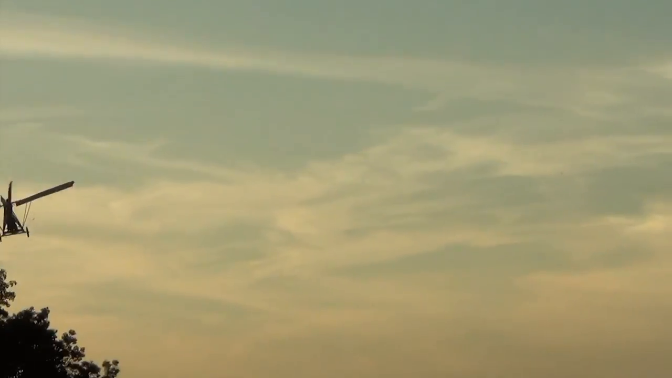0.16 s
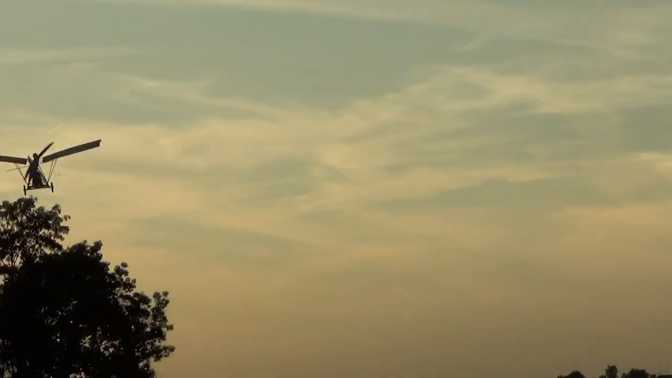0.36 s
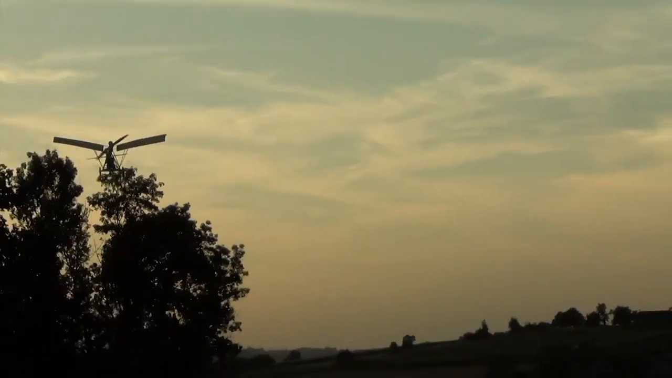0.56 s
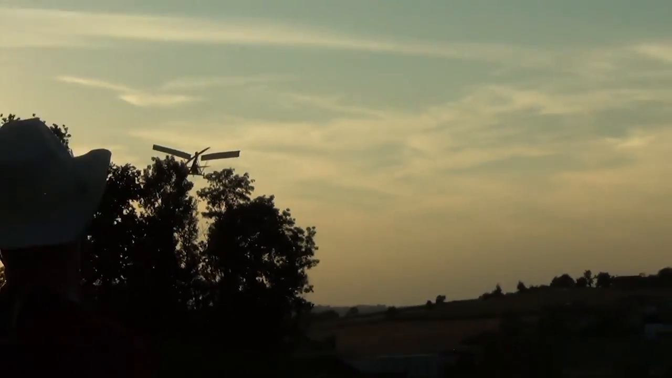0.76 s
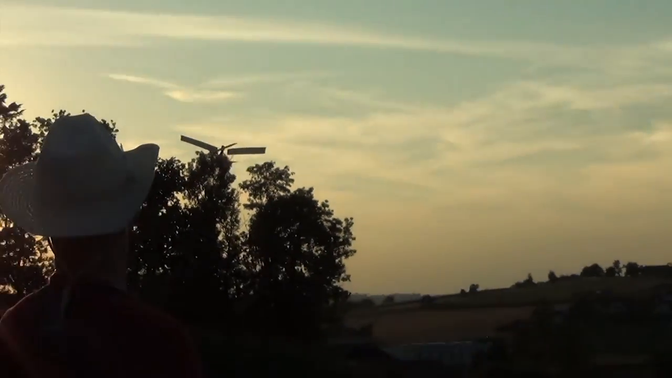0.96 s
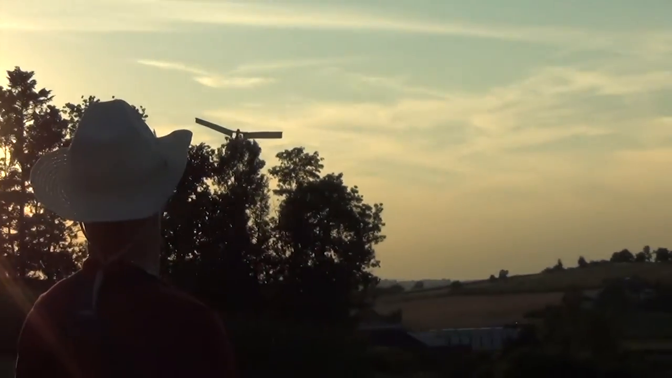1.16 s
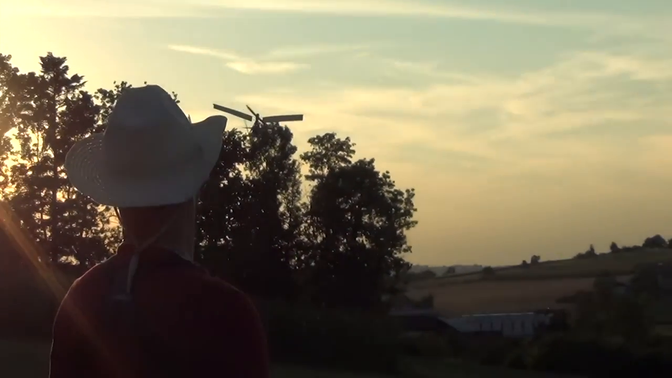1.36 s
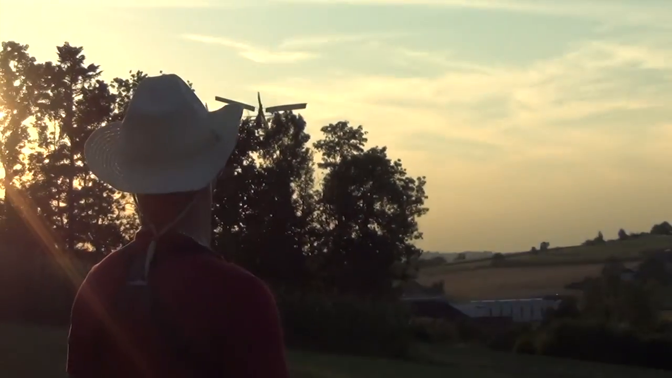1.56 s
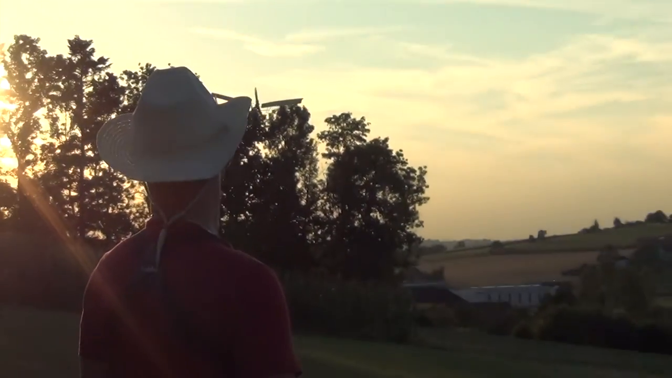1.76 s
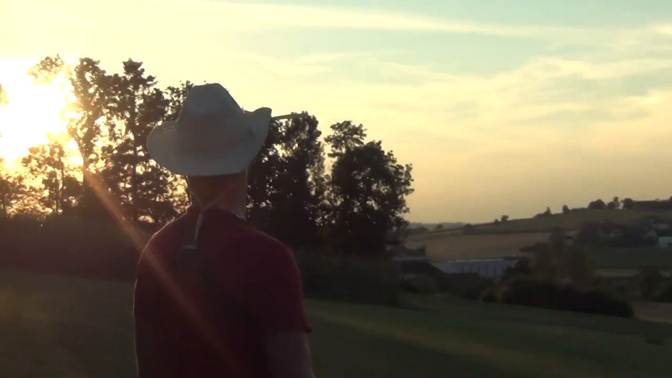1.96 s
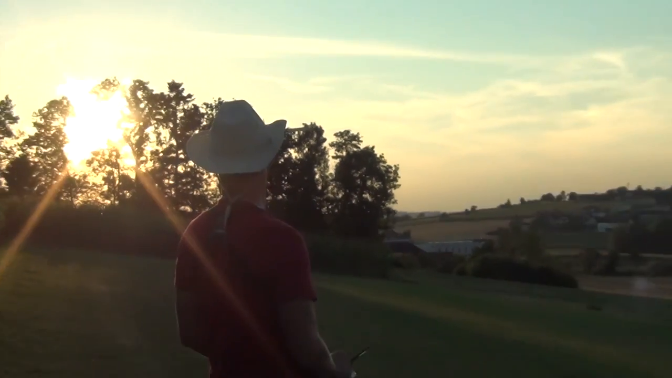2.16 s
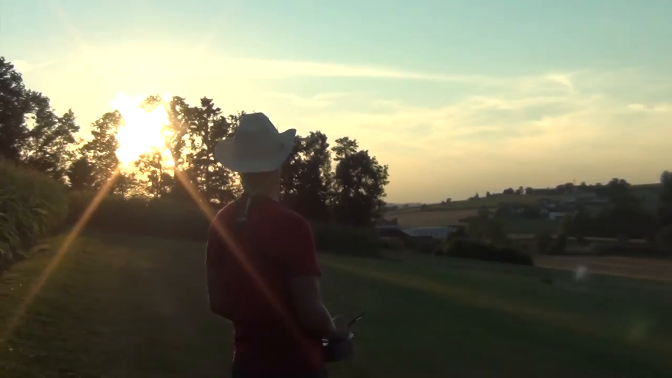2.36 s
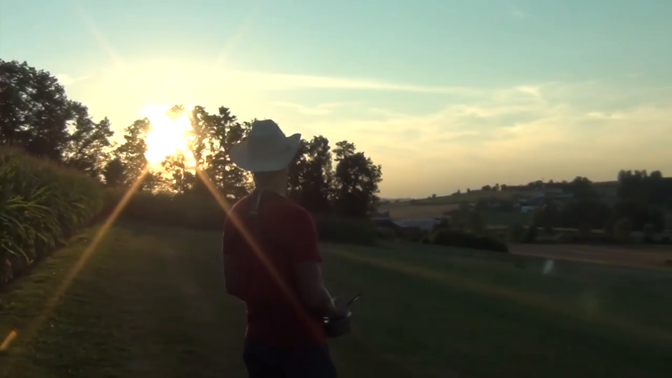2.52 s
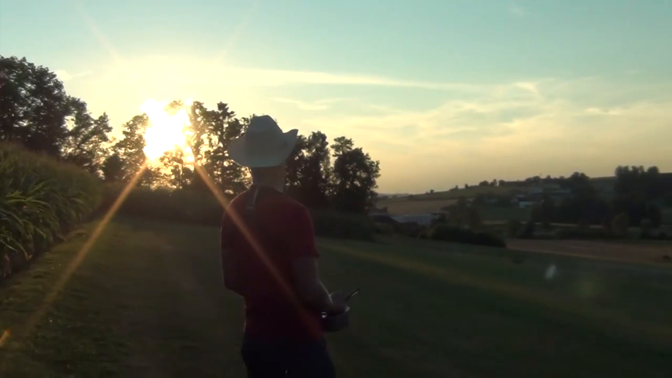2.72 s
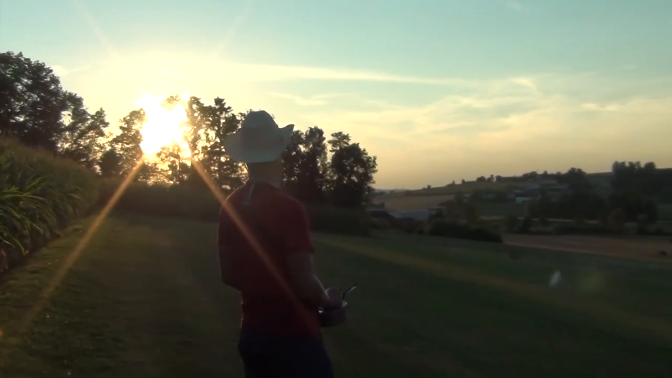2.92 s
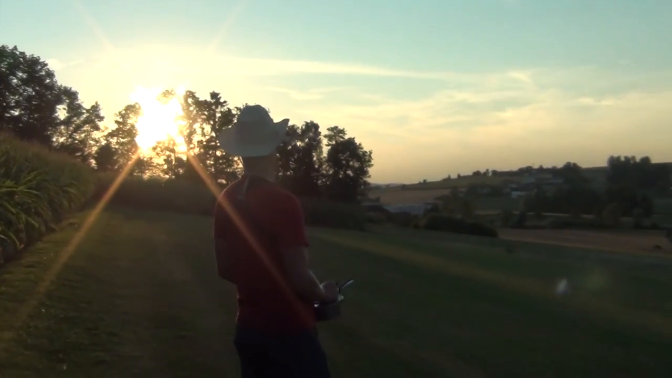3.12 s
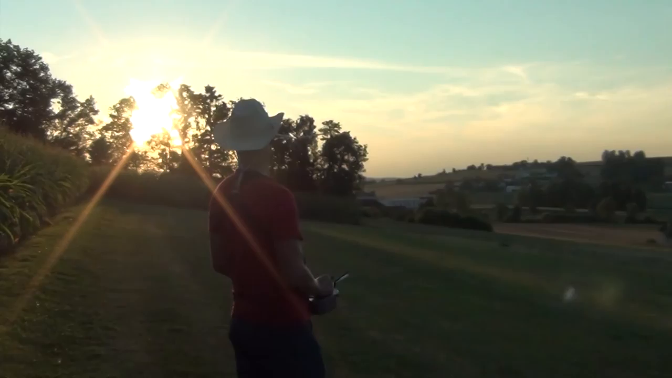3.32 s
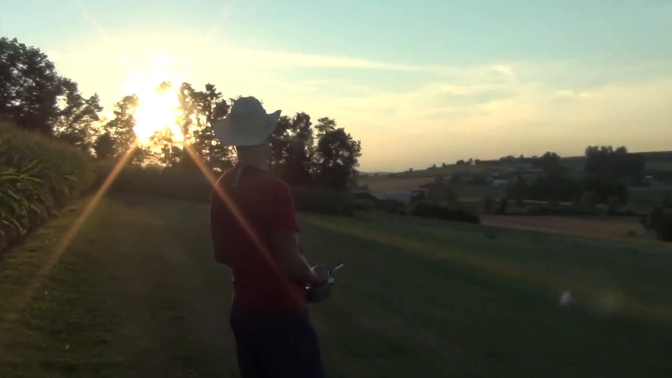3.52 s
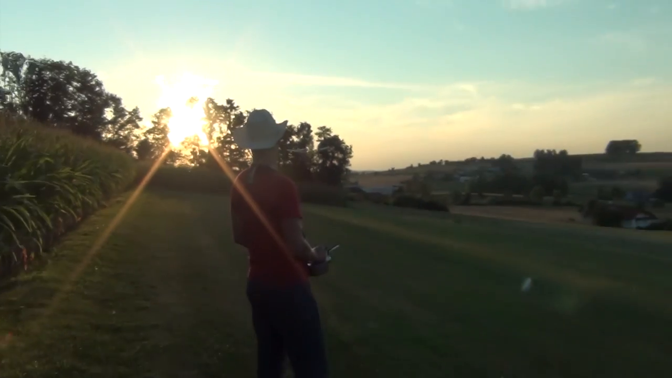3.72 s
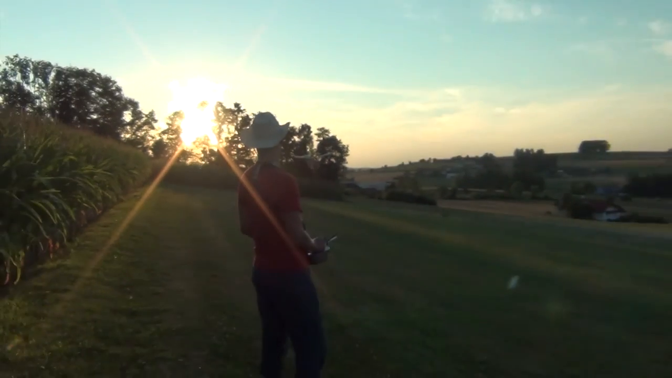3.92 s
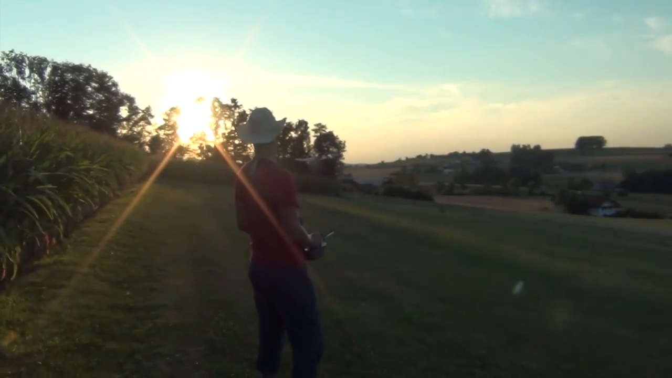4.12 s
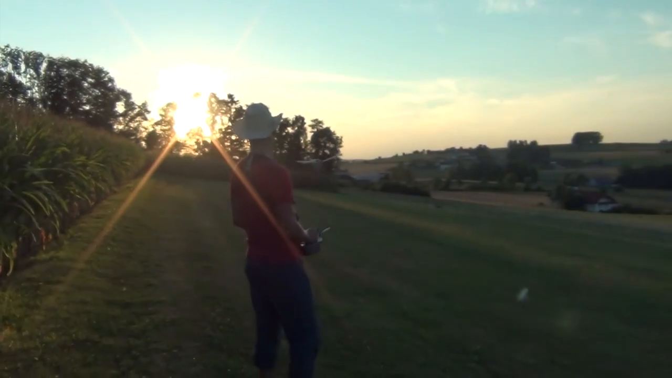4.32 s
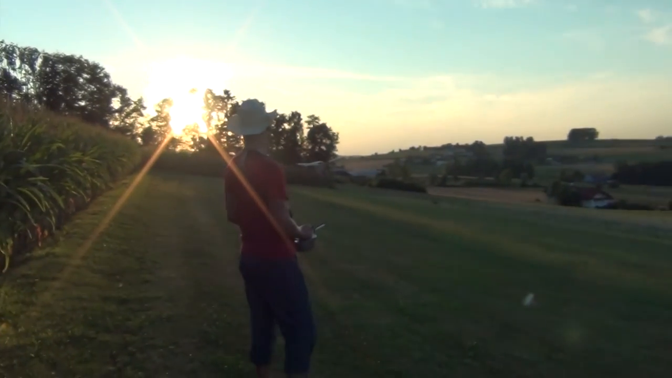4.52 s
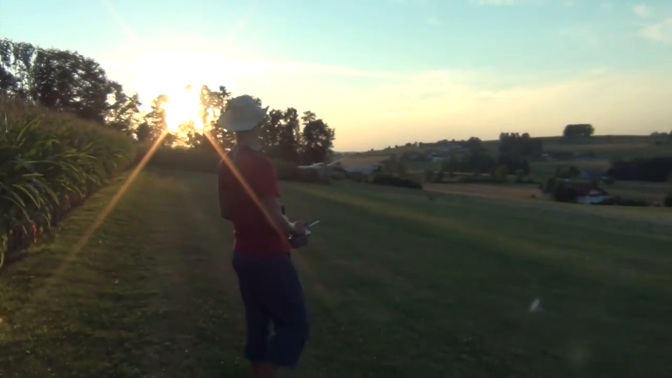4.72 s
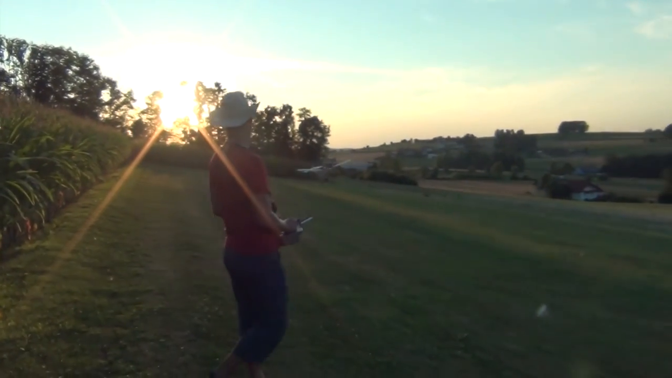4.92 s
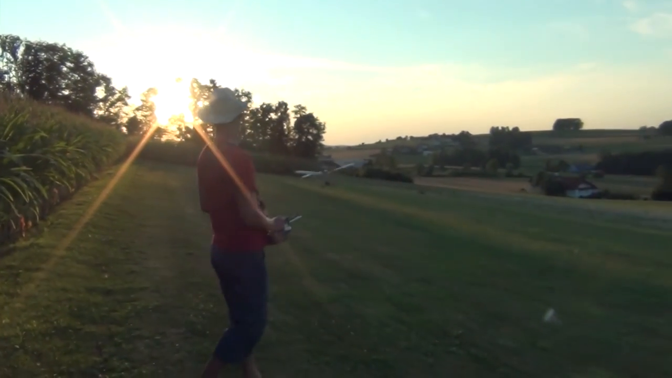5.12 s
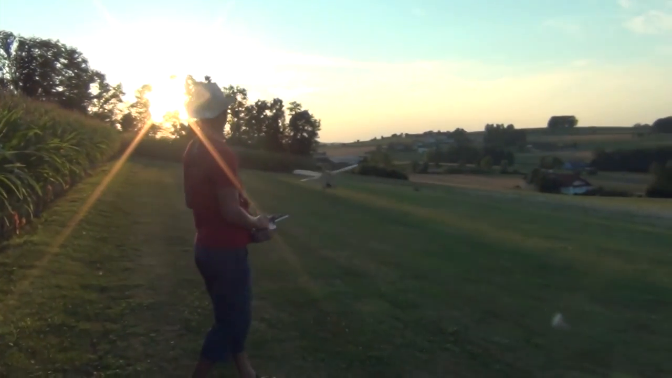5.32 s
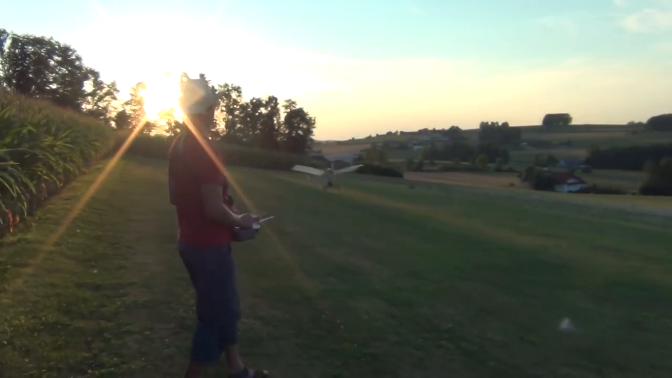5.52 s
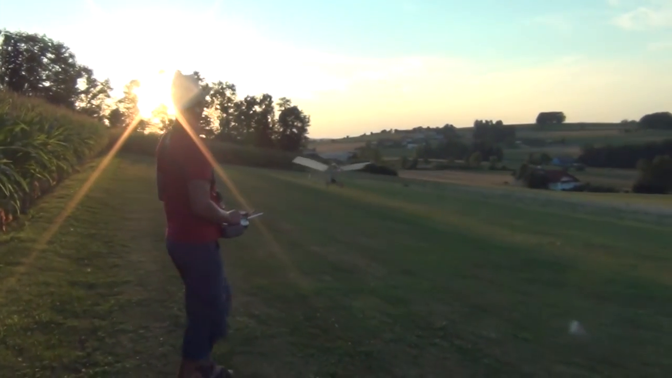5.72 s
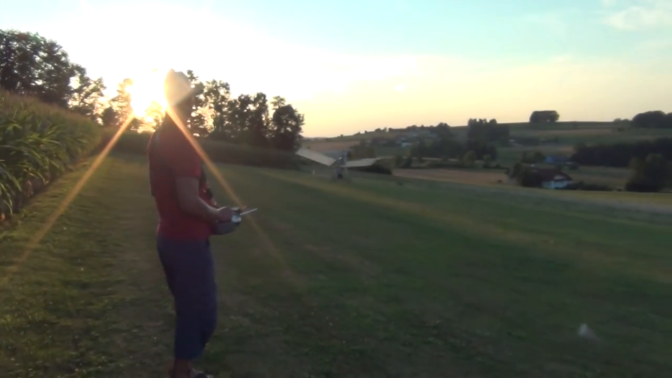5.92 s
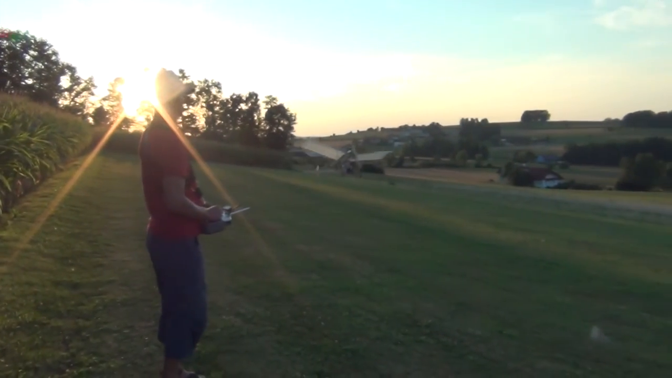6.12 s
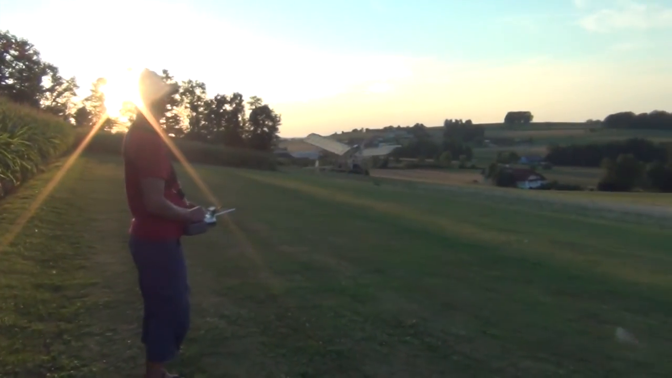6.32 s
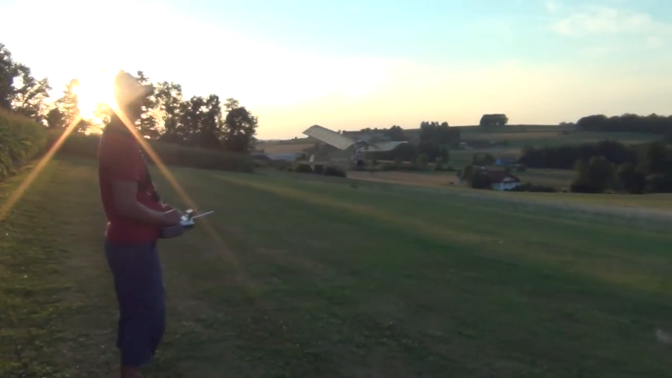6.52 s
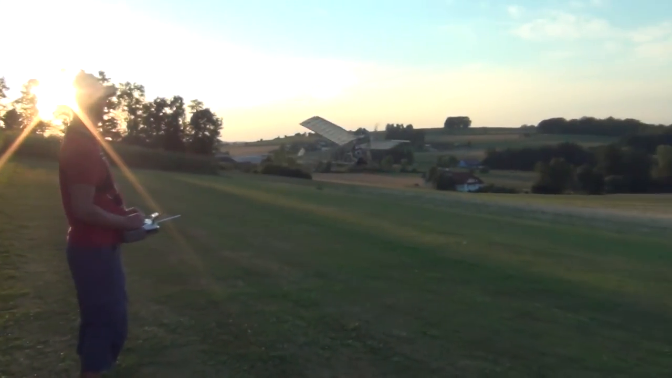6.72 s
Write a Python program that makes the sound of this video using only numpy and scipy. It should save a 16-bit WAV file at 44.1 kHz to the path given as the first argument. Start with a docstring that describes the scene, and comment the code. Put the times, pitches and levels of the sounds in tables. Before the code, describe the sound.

In an open field, a small electric model aircraft whirs faintly while a distant engine drones and slowly speeds up. A few dull knocks sound near the microphone. Past four seconds the geared whine climbs and grows much louder and brighter, peaks just after five seconds, then sinks in pitch into a harsh, rattling flutter close by.

```python
"""An open field, where a geared electric model aircraft circles and flies in close. Its motor pinion drives a
two-blade propeller: the gear whine wobbles once a turn, the blades chirp, and the teeth rattle in the light
airframe, slapping once a blade when the throttle drops. An engine drones far away, slowly gaining speed; a few
soft knocks sound near the microphone, and the motor mount pings once. Whines are phase-modulated sines that
follow the shaft speeds; rattle and scraping are pulsed, filtered noise."""
import sys
import numpy as np
from scipy import signal
from scipy.fft import rfft, irfft
from scipy.io import wavfile
from scipy.ndimage import uniform_filter1d

SR = 44100
rng = np.random.default_rng(int(sys.argv[2]) if len(sys.argv) > 2 else 0)


def generate_wav(sig):
    """Save sig (samples, or channels by samples) to the path in sys.argv[1] as 16-bit PCM at SR."""
    pcm = np.round(np.clip(np.atleast_2d(sig).T, -1, 1) * 32767).astype(np.int16)
    wavfile.write(sys.argv[1], SR, pcm)


N = 302905
TIME = np.arange(N) / SR
GEAR_RATIO, PINION_TEETH = 4.5, 10  # motor turns per propeller turn; teeth on the motor pinion


def undb(db):
    """Decibels to gain."""
    return 10 ** (np.asarray(db) / 20)


def unit(x):
    """Scale to rms 1."""
    return x / np.sqrt(np.mean(x ** 2))


def curves(table):
    """The columns after the time column, drawn as straight lines through every sample."""
    seconds, *columns = np.transpose(table)
    return [np.interp(TIME, seconds, column) for column in columns]


def level(table):
    """The gain that follows a table of time and level."""
    return undb(curves(table)[0])


def walk(rate):
    """Smooth chance that changes about rate times a second; spread near 1."""
    hold = max(2, int(SR / rate))
    steps = np.repeat(rng.standard_normal(N // hold + 1), hold)
    smooth = uniform_filter1d(uniform_filter1d(steps, hold), hold)
    return unit(smooth[:N])


def colour(x, points, bumps=()):
    """Filter by (Hz, dB) points and by resonant (Hz, width Hz, dB) bumps."""
    f = np.arange(N // 2 + 1) * SR / N
    hz, db = np.transpose(points)
    shape = np.interp(np.log(f + 1), np.log(hz), db)
    for centre, width, height in bumps:
        shape = shape + height * np.exp(-2 * ((f - centre) / width) ** 2)
    return irfft(rfft(x) * undb(shape), N)


def blend(tone, noise, share):
    """Tone and noise at constant power; share is the tone's part."""
    share = np.clip(share, 0, 1)
    return np.sqrt(share) * tone + np.sqrt(1 - share) * noise


def throb(turns, depth_db):
    """A swell once a cycle, rms 1."""
    return unit(undb(depth_db * np.cos(2 * np.pi * turns)))


# Spectrum of the open-field background, relative
# Columns: pitch_hz, density_db_per_hz
FIELD_COLOUR = [(15, -60), (25, -27.5), (97, -13), (145, -5.5), (168, -6), (195, -6), (247, -10.5),
                (303, -8), (461, -10.5), (619, -1), (814, -1.5), (1070, -4.5), (1200, -10), (2000, -12),
                (2600, -45), (4400, -120)]
# Level of the background
# Columns: time_s, level_db
FIELD_LEVEL = [(0, -52.5), (.24, -51.5), (.3, -49.5), (.75, -48), (1.15, -51.5), (1.9, -49), (2.9, -46.5),
               (3.5, -47.5), (6.87, -44)]


def field():
    """Distant country noise, random noise in a fixed colour, that swells gently."""
    air = unit(colour(rng.standard_normal(N), FIELD_COLOUR))
    return air * undb(curves(FIELD_LEVEL)[0] + 0.22 * walk(5.7))


# Speed of the distant engine
# Columns: time_s, rate_firings_per_s
ENGINE_SPEED = [(0, 72), (1, 73.8), (1.5, 75.6), (3.5, 80.8), (4, 81.8), (4.6, 82.5), (6.87, 82.7)]
# Level of the fifth partial, which moves on its own
# Columns: time_s, level_db
FIFTH_LEVEL = [(0, -61), (.2, -61), (.5, -69.5), (6.87, -69)]
# Level of the drone
# Columns: time_s, level_db
DRONE_LEVEL = [(0, -71.5), (2.1, -62.5), (2.9, -51), (3.5, -52.5), (3.85, -69.5), (4.25, -52.5), (5.4, -51),
               (6.87, -71.5)]
# Partials of the drone, relative to its level
# Columns: multiple_of_firing_rate, strength_db
DRONE_PARTIALS = [(3, -12), (4, 1.5)]
# Level of the exhaust pipe tone
# Columns: time_s, level_db
PIPE_LEVEL = [(0, -64), (.45, -57), (1.2, -66), (1.95, -62), (2.25, -60.5), (2.92, -48), (3.15, -50),
              (3.4, -59), (4.2, -57.5), (4.35, -47.5), (4.5, -55), (5.2, -51), (5.45, -57), (5.8, -41.5),
              (6.05, -41.5), (6.3, -60.5), (6.7, -45), (6.87, -50)]
# Partials of the pipe tone, relative to its level
# Columns: multiple_of_firing_rate, strength_db
PIPE_PARTIALS = [(7, -1.5), (8, -10.5)]
# Level of the engine's bark
# Columns: time_s, level_db
BARK_LEVEL = [(0, -77), (.75, -57), (1.2, -70), (1.4, -58.5), (1.8, -63), (2, -60), (2.2, -54.5),
              (2.42, -44.5), (2.65, -57), (2.92, -48.5), (3.25, -52.5), (3.6, -60.5), (6.87, -55.5)]
# Partials of the bark, relative to its level
# Columns: multiple_of_firing_rate, strength_db
BARK_PARTIALS = [(8, -8), (9, 1), (10, -3.5), (12, -13), (13, -11.5)]
# Level of an extra eighth partial, which swells on its own
# Columns: time_s, level_db
EIGHTH_LEVEL = [(0, -77), (.22, -67), (.3, -51), (.55, -61.5), (1.2, -72)]
# Level of the eleventh partial, which swells on its own
# Columns: time_s, level_db
ELEVENTH_LEVEL = [(0, -70), (.55, -63), (.75, -54.5), (1.2, -59.5), (1.4, -52.5), (1.75, -60),
                  (1.98, -50.5), (2.45, -53), (2.63, -74), (2.85, -51), (3.5, -64)]
ENGINE_HUM_DB = -55.5  # steady hum at twice the firing rate


def far_engine(waver_db=1.9, smear=0.22, scramble=0.71):
    """Exhaust partials that waver in the moving air: the low hum, and the bark above it."""
    firing = 2 * np.pi * np.cumsum(curves(ENGINE_SPEED)[0]) / SR

    def partial(order, db):
        """Echoes on the long way shift its phase, which softens the pulses into a drone."""
        phase = scramble * rng.standard_normal() + smear * walk(25)
        return np.sqrt(2) * undb(db + waver_db * walk(9)) * np.cos(round(order) * firing + phase)

    def chord(partials, level_table):
        """Several partials that share one level curve."""
        level_db, = curves(level_table)
        return sum(partial(order, db + level_db) for order, db in partials)

    hum = partial(order=2, db=ENGINE_HUM_DB)
    hum = hum + partial(order=5, db=curves(FIFTH_LEVEL)[0])
    drone = chord(DRONE_PARTIALS, DRONE_LEVEL)
    pipe = chord(PIPE_PARTIALS, PIPE_LEVEL)
    bark = chord(BARK_PARTIALS, BARK_LEVEL)
    bark = bark + partial(order=8, db=curves(EIGHTH_LEVEL)[0])
    bark = bark + partial(order=11, db=curves(ELEVENTH_LEVEL)[0])
    return hum + drone, pipe + bark


# Knocks and ticks near the microphone, and one short ping of the aircraft's motor mount near 2.5 kHz; each
# falls 45 dB over its decay # Columns: start_s, level_db, pitch_hz, decay_s, grit_0_to_1
KNOCKS = [(0.63, -47, 850, .25, .95), (0.749, -42.5, 1150, .05, .9), (0.79, -42, 10000, .006, 1),
          (0.992, -41, 430, .06, .6), (2.4152, -25, 1300, .013, .45), (2.4183, -30, 1150, .012, .3),
          (2.4255, -27, 900, .018, .35), (2.4285, -29, 1500, .016, .45), (3.84, -52, 65, .22, .5),
          (3.984, -33.5, 2550, .022, .1), (4.235, -50, 70, .14, .5), (4.402, -35, 1700, .06, .95),
          (6.295, -41, 350, .05, .9)]


def knocks():
    """Dull, quickly damped knocks, part ring and part grit."""
    out = np.zeros(N)
    for start, db, hz, decay, grit in KNOCKS:
        sounding = (TIME > start) & (TIME < start + decay)
        t = TIME[sounding] - start
        band = signal.butter(3, [hz / 2, 2 * hz], "bandpass", fs=SR, output="sos")
        grain = unit(signal.sosfilt(band, rng.standard_normal(len(t))))
        attack = np.minimum(1, 2 * hz * t)  # half a cycle
        ring = -np.sqrt(2) * np.sin(2 * np.pi * hz * t) * attack
        out[sounding] += undb(db - 45 * t / decay) * blend(ring, grain, 1 - grit)
    return out


# Colour of the tooth rattle
# Columns: pitch_hz, gain_db
RATTLE_COLOUR = [(260, -64), (450, -14), (561, -8.5), (752, -9.5), (884, -47), (1200, 0), (1900, -7.5),
                 (2580, -3.5), (2820, -4), (3460, -6.5), (3830, -5), (6130, -3), (7310, -10), (10500, -13),
                 (15000, -41)]
# Airframe resonances and hollows
# Columns: centre_hz, width_hz, gain_db
AIRFRAME = [(2040, 190, -3), (2520, 830, 1), (3294, 325, 7), (3990, 280, -3.5), (6760, 290, 6),
            (7220, 680, -4.5)]


def tooth_clicks(teeth, scatter_db):
    """One click of chance size and sign each time a tooth engages."""
    at = np.flatnonzero(np.diff(np.floor(teeth)) > 0)
    chance = rng.standard_normal((len(at), 2))
    clicks = np.zeros(N)
    clicks[at] = undb(scatter_db * chance[:, 0]) * np.sign(chance[:, 1])
    return unit(clicks)


def tooth_rattle(motor, blades, slack, near, scrape_db=4):
    """Tooth clicks and scraping, pulsed by blades and motor turns, ring the light airframe."""
    contact = tooth_clicks(PINION_TEETH * motor, scatter_db=3.0)
    contact = contact + undb(scrape_db) * rng.standard_normal(N)
    # a slow, slack train chatters more deeply
    contact = contact * throb(blades, depth_db=near * (1.46 + 0.61 * slack))
    contact = contact * throb(motor, depth_db=near * (1.0 + 0.81 * slack))
    return unit(colour(contact, RATTLE_COLOUR, AIRFRAME))


def chatter(prop, blades, points, blade_db, motor_db):
    """Scraping that swells with each blade and each motor turn, heard through one resonance."""
    scrape = rng.standard_normal(N) * throb(blades, blade_db)
    scrape = scrape * throb(GEAR_RATIO * prop + rng.random(), motor_db)
    return unit(colour(scrape, points))


# Low tones of blades and motor, relative to each other
# Columns: multiple_of_propeller_speed, strength_db
HUM_ORDERS = [(2, -32), (3, -15), (4, -3), (4.5, 0), (6, -9), (8, -13)]


def low_hum(prop):
    """Low tones of blades and motor, locked to the propeller, each wavering in level."""
    return unit(sum(undb(db + 2.2 * walk(25)) * np.sin(2 * np.pi * k * prop) for k, db in HUM_ORDERS))


def runout(turns, count):
    """Tooth errors that come round again on every turn of the big gear; spread near 1."""
    phases = rng.uniform(0, 2 * np.pi, count)
    return unit(sum(np.sin(2 * np.pi * k * turns + p) / np.sqrt(k) for k, p in enumerate(phases, 2)))


# How far the mesh tone swings once a turn; the big gear wobbles while the throttle opens
# Columns: time_s, swing_radians
WOBBLE = [(0, .3), (3.85, .4), (4.15, 2), (4.5, 2.6), (4.95, 2.1), (5.12, .6), (6.87, .8)]
# Mesh overtones from the third up, relative to each other
# Column: strength_db
OVERTONE_DB = [-21, -7, -6, -3, -1, 0, -6, -10]
# Colour of the upper mesh overtones
# Columns: pitch_hz, gain_db
WHISTLE_COLOUR = [(3000, -28), (4200, -14), (6300, 0), (7500, -5), (8850, -7), (9500, -2), (10500, -6),
                  (11300, -9.5), (12300, -9), (15000, -18)]


def mesh_tones(speed, prop, blades, slack, near, uneven=0.018, flutter=.014):
    """The gear mesh tone, its octave and its high whistle, each near rms 1, at the rate the teeth meet."""
    motor = GEAR_RATIO * prop
    steady = 2 * np.pi * PINION_TEETH * motor
    # the big gear runs off centre and swings the tone once a turn
    wobble = curves(WOBBLE)[0] * (np.sin(2 * np.pi * prop) + .25 * runout(prop, count=4))
    # close by, each blade makes the tone surge: thin lines either side
    blade_swing = 1.25 * near * np.sin(2 * np.pi * (blades - .1))
    jitter = (.2 + .45 * near) * walk(250) + .35 * walk(30)
    mesh = np.sin(steady + wobble + blade_swing + jitter)
    mesh = mesh * throb(blades + .1, depth_db=6 * near ** 2)
    mesh = mesh * undb(.8 * runout(prop, count=8) + 1.8 * walk(180) + 1.2 * walk(30))
    # the wing radiates only this band
    mesh = colour(mesh, [(700, -25), (1000, 1), (1150, 0.5), (1520, -0.5), (1800, -6)])

    # the teeth bounce within their play, which roughens the overtones far more
    swing = .055 * np.sin(2 * np.pi * prop) + uneven * runout(prop, count=5) + flutter * walk(300)
    swing_speed = speed * (1 - .85 * slack) * swing
    lead = 2 * np.pi * PINION_TEETH * GEAR_RATIO * np.cumsum(swing_speed) / SR
    octave = np.sin(2 * steady + wobble + .5 * lead * near + .75 * walk(90))
    octave = octave * throb(motor, depth_db=4.5) * undb(2 * walk(200))
    overtones = sum(undb(db + 3.5 * walk(330)) * np.sin(k * (steady + lead) + 1.1 * walk(800))
                    for k, db in enumerate(OVERTONE_DB, 3))
    whistle = unit(colour(overtones, WHISTLE_COLOUR)) * throb(motor, depth_db=3.5)
    return unit(mesh), unit(octave), whistle


# Level of the slack teeth slapping, in bouts
# Columns: time_s, level_db
SLAP_LEVEL = [(0, -75), (5.4, -55), (5.9, -42), (6.36, -40.5), (6.385, -32), (6.44, -33), (6.48, -39),
              (6.51, -31), (6.58, -31), (6.605, -35), (6.66, -32.5), (6.7, -30), (6.87, -31.5)]
# Colour of a slap
# Columns: pitch_hz, gain_db
SLAP_COLOUR = [(300, -50), (2100, -22), (2600, -11), (3600, -7), (5200, -0.5), (6300, 5.5), (6850, 2),
               (7300, -7), (10800, -11), (12000, -11), (14000, -21)]
SLAP_ATTACK_S, SLAP_DECAY_S, RING_DECAY_S = 0.0014, 0.01, 0.0067
RING_HZ, RING_DB = 2577, -5  # the mount's ring, and its level beside the grit


def strikes(blades, speed, decay_s):
    """A quick rise and a fall once a blade, rms 1."""
    since_s = (blades % 1) / (2 * speed)
    rise = 1 - np.exp(-(since_s / SLAP_ATTACK_S) ** 2)
    return unit(rise * np.exp(-since_s / decay_s))


def slaps(blades, speed, scatter_db=2.0, ring_scatter_db=4):
    """Each blade throws the slack teeth across their play: a burst of grit, and the mount rings."""
    which = np.floor(blades - np.floor(blades.min())).astype(int)
    chance = rng.standard_normal((which.max() + 1, 2))[which]  # one draw for each blade
    grit = rng.standard_normal(N) * strikes(blades, speed, SLAP_DECAY_S)
    grit = unit(colour(grit, SLAP_COLOUR))
    ring = np.sin(2 * np.pi * RING_HZ * TIME + 1.1 * walk(150)) * strikes(blades, speed, RING_DECAY_S)
    ring = unit(ring * undb(ring_scatter_db * chance[:, 1]))
    return (grit + undb(RING_DB) * ring) * undb(curves(SLAP_LEVEL)[0] + scatter_db * chance[:, 0])


# Blade whistle
# Columns: time_s, pitch_hz, level_db
TIP = [(0, 8400, -73), (.45, 8550, -62), (.7, 8850, -58), (1.1, 8850, -60), (1.45, 8650, -67),
       (1.7, 8700, -62), (1.9, 8850, -56), (2.35, 9000, -57), (2.9, 9000, -59.5), (3.35, 8720, -59),
       (3.8, 8950, -56), (4.25, 9850, -48), (4.65, 9800, -42), (4.87, 10200, -37), (5.2, 10700, -40),
       (5.5, 10300, -34), (5.8, 10150, -34), (6.15, 9850, -42), (6.87, 9900, -53)]
# close by, as shares of the pitch: rise during one pass; distance of each blade from the mean
TIP_SWEEP, TIP_MISMATCH = 0.16, 0.0323


def tip_whistle(blades, near, rough=0.74, flicker_db=2.0):
    """Each blade chirps upwards as it swings towards the microphone, one higher than the other."""
    centre_hz, level_db = curves(TIP)
    sweep = blades % 1
    mismatch = TIP_MISMATCH * np.sign(np.sin(np.pi * blades))
    width = np.clip(near / .6, 0, 1) ** 2  # the chirps are wider close by
    hz = centre_hz * (1 + width * (TIP_SWEEP * (sweep - .5) + mismatch) + .008 * walk(60))
    tone = np.sin(2 * np.pi * np.cumsum(hz) / SR + rough * walk(900))
    chirps = tone * np.sin(np.pi * sweep) * undb(flicker_db * walk(150))
    chirps = colour(chirps, [(10600, -2.0), (11500, -2), (12500, -8)])
    return unit(chirps) * undb(level_db)


# Propeller speed
# Columns: time_s, speed_turns_per_s
PROP_SPEED = [(0, 24.2), (.6, 25.5), (1, 25.46), (1.55, 25), (2, 25.72), (2.5, 25.65), (3.1, 25.25),
              (3.45, 25.32), (3.72, 25.8), (3.95, 26.35), (4.35, 29.05), (4.72, 29.2), (4.9, 31.15),
              (5, 31.8), (5.12, 33.15), (5.2, 33.75), (5.28, 33.4), (5.36, 32.4), (5.45, 30.9),
              (5.55, 29.85), (5.8, 28.66), (5.9, 27.86), (6.05, 26.35), (6.22, 25.2), (6.45, 24.6),
              (6.6, 24.25), (6.87, 24.1)]
# Level of the aircraft's body sound as it turns and nears
# Columns: time_s, level_db
APPROACH = [(0, -51), (.45, -49), (1.4, -49.5), (2.6, -48.5), (3.7, -46.5), (4.3, -46.5), (5, -37),
            (6.25, -35), (6.7, -33.5), (6.87, -33)]
# Level of the gear mesh tone, which beams at the microphone as the aircraft banks
# Columns: time_s, level_db
MESH_LEVEL = [(0, -61), (.6, -62), (.95, -59), (1.5, -66), (2.1, -55), (2.6, -69), (3.2, -67), (3.5, -61),
              (3.8, -50.5), (4, -49.5), (4.3, -43.5), (4.72, -42), (4.87, -37.5), (5.05, -36), (5.2, -36),
              (5.45, -36), (5.65, -32), (5.85, -34), (6, -40), (6.15, -41), (6.4, -49.5), (6.87, -43.5)]
# Level of the motor's ninth partial, just under the mesh tone
# Columns: time_s, level_db
NINTH_LEVEL = [(0, -72), (1.4, -65), (2.4, -65), (2.9, -58), (3.5, -56), (4, -58), (4.3, -67), (6.87, -65)]
# Level of the high whistle
# Columns: time_s, level_db
WHISTLE_LEVEL = [(0, -56), (.75, -55), (1.4, -78), (2.2, -52), (3.75, -57), (4.3, -38), (4.85, -31),
                 (5.3, -31), (5.7, -29.5), (6.25, -32), (6.87, -30)]
FAR_DB, NEAR_DB = -56, -35  # approach levels at which it sounds wholly distant and wholly close
SLAP_AT_S = 6.623  # a blade loads the slack teeth about now, and once a blade before and after
SURGE_TURNS_PER_S2 = 9.1  # hard acceleration of the propeller
# body layers, relative to the approach level
RATTLE_DB = 2.5
OCTAVE_DB, OCTAVE_NEAR_DB = -9, -5  # far off; change close by
MOUNT_DB, MOUNT_SLACK_DB, MOUNT_NEAR_DB = -6, 6, -5.5  # under load; change when slack; change close by
SIZZLE_DB, SIZZLE_SLACK_DB, SIZZLE_SURGE_DB = -17, -18, -7  # steady; added when slack; when speeding up hard
HUM_DB, HUM_SLACK_DB = -16.5, -6.5  # under load; change when slack
WHISTLE_DB = -1.5  # relative to the high whistle's level
WHISTLE_PURITY, OCTAVE_PURITY = 0.51, 0.87  # share of tone rather than scraping, teeth tight
TURN_S, TURN_DB, TURN_FADE_DB_PER_S = 4.26, -39, 40  # the octave beams over as the aircraft banks round
STRAIN_DB = -49  # the octave sings out clean at full throttle


def plane():
    """One shaft speed drives the gear whine, the tooth rattle, the hum and the blade chirps."""
    speed, = curves(PROP_SPEED)
    level_db, = curves(APPROACH)
    surge = np.clip(np.gradient(speed, TIME) / SURGE_TURNS_PER_S2, 0, 1)
    surge = uniform_filter1d(surge, size=SR // 8)
    prop = np.cumsum(speed) / SR + .002 * walk(8)
    prop = prop - np.interp(SLAP_AT_S, TIME, prop)
    motor = GEAR_RATIO * prop
    # each passing blade and each motor turn loads the teeth
    blades = 2 * prop - .17 + .06 * walk(40)
    slack = np.clip((30 - speed) / 6, 0, 1)
    # from far off, scatter from the ground and trees fills in the gaps between the pulses
    near = np.clip((level_db - FAR_DB) / (NEAR_DB - FAR_DB), 0, 1)
    loose = near ** 2 * slack
    strain = np.clip((speed - 29.5) / 3, 0, 1)

    rattle = tooth_rattle(motor, blades, slack, near)
    mesh, octave, whistle = mesh_tones(speed, prop, blades, slack, near)
    # the frame, the motor mount and the gear wheel ring beside the three tones
    frame_hz_db = [(1300, -39), (1600, -3.5), (1900, 1.0), (2150, -19), (2600, -42)]
    frame = chatter(prop, blades, frame_hz_db, blade_db=-3.5, motor_db=5)
    mount_hz_db = [(1900, -62), (2300, 1.5), (2560, 8.0), (2680, -5.0), (2950, -53), (4000, -60)]
    mount = chatter(prop, blades, mount_hz_db, blade_db=2.5 + .5 * near, motor_db=4.0)
    mount = unit(mount * undb(2 * near * walk(30)))
    wheel_hz_db = [(300, -50), (7500, -11), (9200, -4.5), (10500, -1.0), (11300, -9.0), (13000, -29)]
    wheel = chatter(prop, blades + 0.22, wheel_hz_db, blade_db=2.5, motor_db=5.5)
    # close by, a fine sizzle comes once a motor turn
    sizzle_hz_db = [(7000, -40), (10000, -9), (12000, 3), (13000, 2), (15000, -15)]
    sizzle = chatter(prop, blades, sizzle_hz_db, blade_db=-3, motor_db=8.9 * near)
    hum = low_hum(prop)
    ninth = unit(np.sin(2 * np.pi * 9 * motor + .4 * walk(30)) * undb(2 * walk(12)))
    octave_phase = 4 * np.pi * PINION_TEETH * GEAR_RATIO * np.cumsum(speed) / SR
    singing = unit(np.sin(octave_phase + 0.67 * walk(60)) * undb(2.2 * walk(40)))

    sizzle_gain = undb(SIZZLE_DB) + undb(SIZZLE_SLACK_DB) * loose ** 4 + undb(SIZZLE_SURGE_DB) * surge ** 2
    body = (rattle * undb(RATTLE_DB)
            + octave * undb(OCTAVE_DB + OCTAVE_NEAR_DB * near)
            + mount * undb(MOUNT_DB + MOUNT_SLACK_DB * slack + MOUNT_NEAR_DB * near)
            + sizzle * sizzle_gain
            + hum * undb(HUM_DB + HUM_SLACK_DB * slack))
    # the upper tones are beamed
    turn_db = TURN_DB - TURN_FADE_DB_PER_S * np.abs(TIME - TURN_S)
    beamed_octave = blend(octave, mount, OCTAVE_PURITY) * throb(blades + 0.27, depth_db=1.0)
    # the whistle breaks up into scraping when the teeth are loose
    treble = blend(whistle, wheel, WHISTLE_PURITY * (1 - loose) ** 0.37) * undb(WHISTLE_DB)
    return (body * undb(level_db)
            + (mesh + undb(-11.0) * frame) * level(MESH_LEVEL)
            + beamed_octave * undb(turn_db)
            + singing * strain * undb(STRAIN_DB)
            + ninth * level(NINTH_LEVEL)
            + treble * level(WHISTLE_LEVEL)
            + tip_whistle(blades, near)
            + slaps(blades + .17, speed))


def place(x, pan_db, spread_db):
    """Left and right ports, with a little scatter from grass and trees in opposite sign on each."""
    t = np.arange(SR // 8) / SR
    scatter = rng.standard_normal(len(t)) * np.exp(-t / 0.035)
    scatter = scatter / np.linalg.norm(scatter)
    side = signal.fftconvolve(x, scatter)[:N] * undb(spread_db)
    # the scatter is weakest around 70 Hz, where both ports hear nearly the same
    side = colour(side, [(25, 0), (70, -34), (160, -18), (400, -3.0), (2000, 2.0), (5000, 6.5), (10000, 3.5)])
    return np.array([x * undb(pan_db / 2) + side, x * undb(-pan_db / 2) - side])


def scene():
    """The field all round, the engine off to the right, the aircraft ahead."""
    hum, bark = far_engine()
    return (place(field(), pan_db=0.0, spread_db=-10.0)
            + place(hum, pan_db=-0.6, spread_db=-20.5)
            + place(bark, pan_db=-4.0, spread_db=-39)
            + place(knocks(), pan_db=1.5, spread_db=-15)
            + place(plane(), pan_db=0.3, spread_db=-22.5))


TOP_HZ = 15100  # upper limit of the recorder


def record(dry):
    """The recorder cuts the top with a steep low-pass."""
    return signal.sosfilt(signal.ellip(10, .2, 80, TOP_HZ, fs=SR, output="sos"), dry)


dry = scene()
out = record(dry)
generate_wav(out)
```